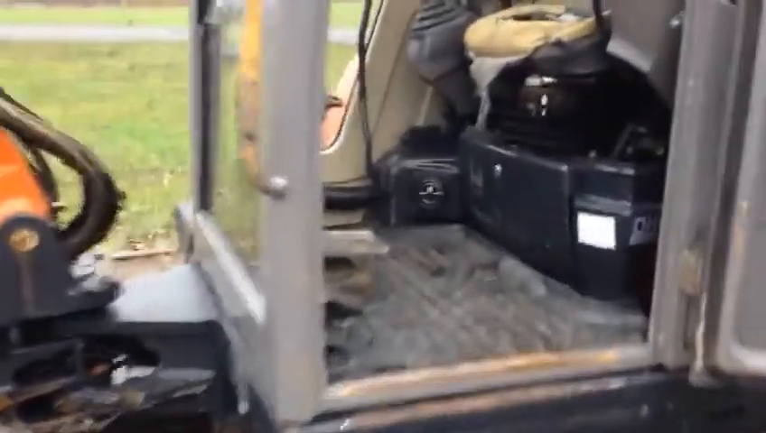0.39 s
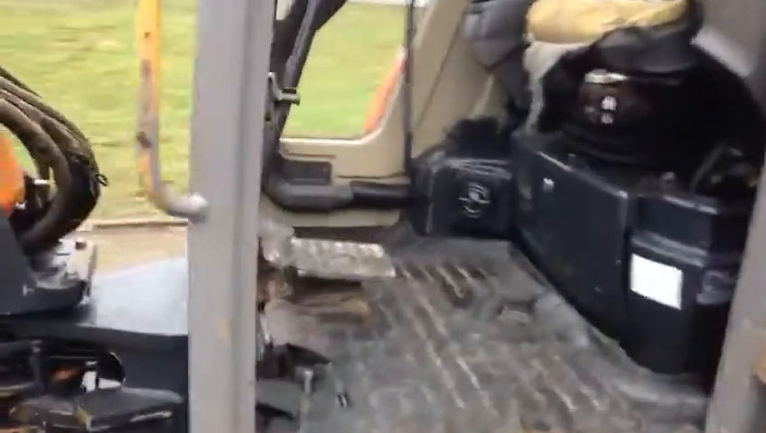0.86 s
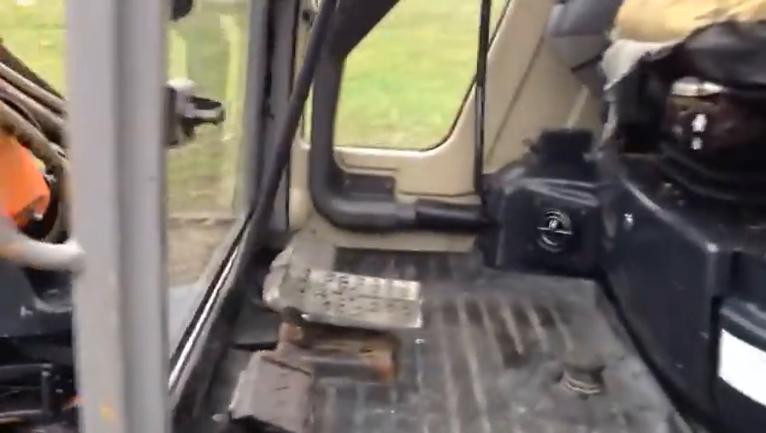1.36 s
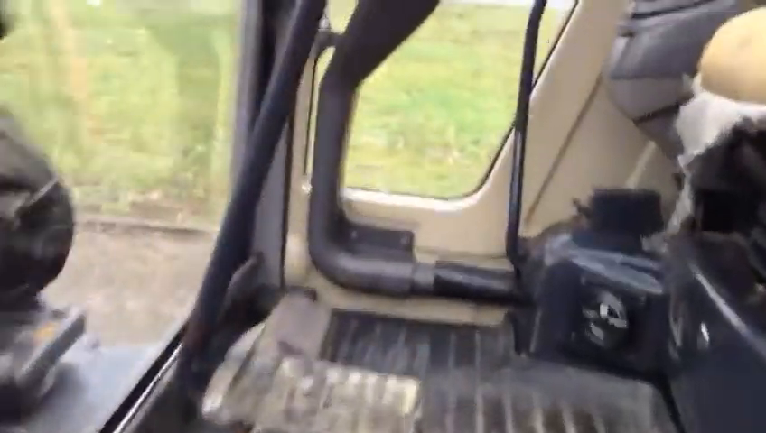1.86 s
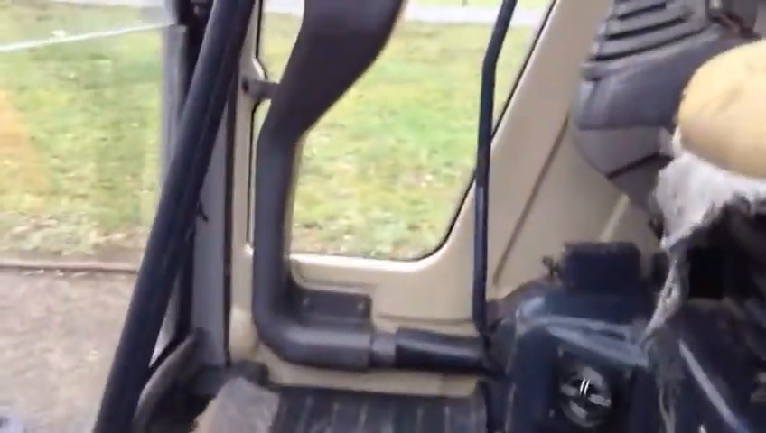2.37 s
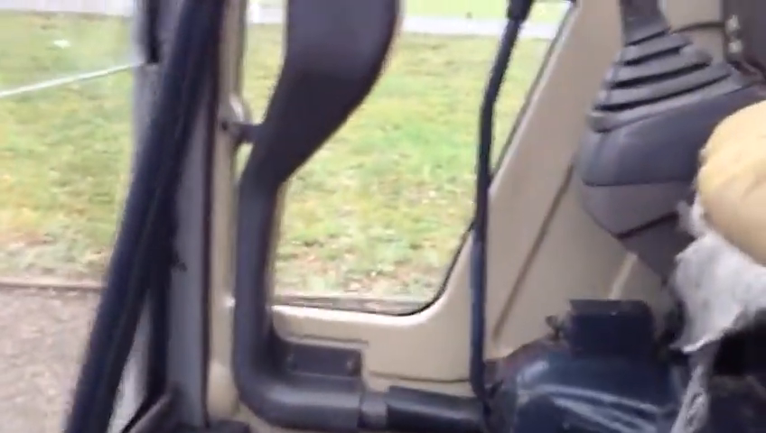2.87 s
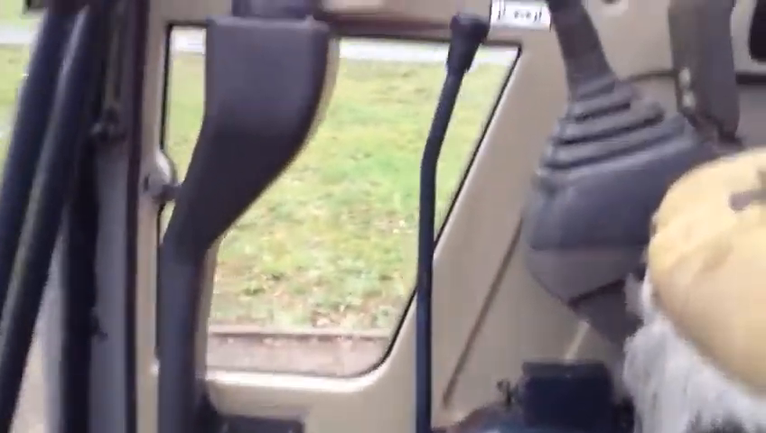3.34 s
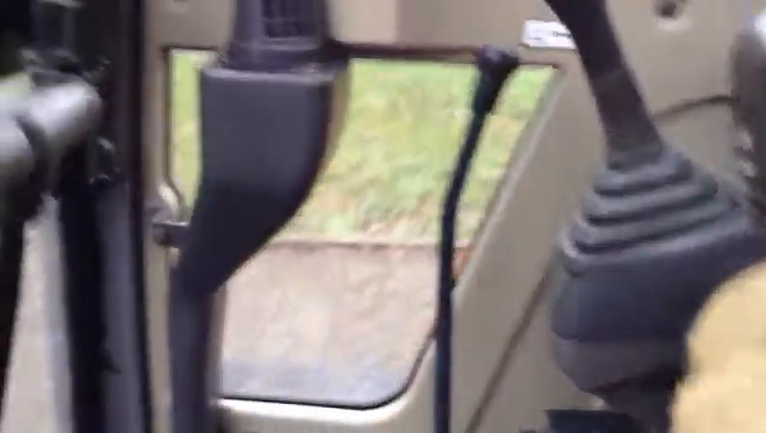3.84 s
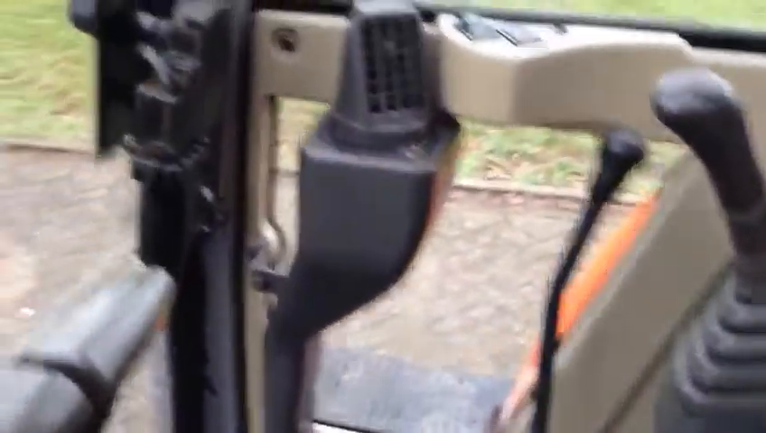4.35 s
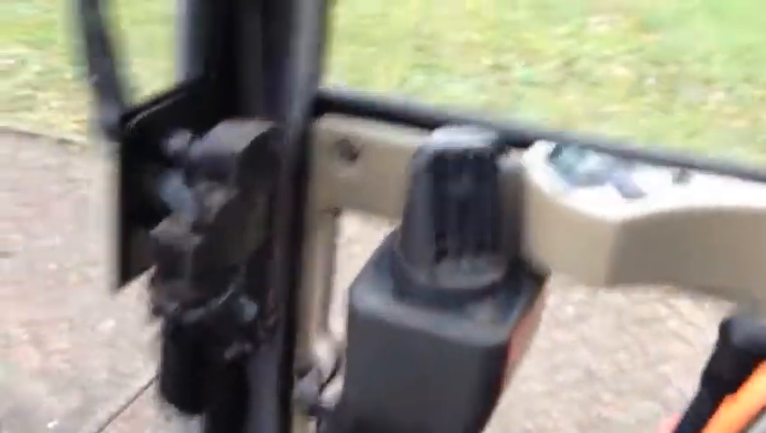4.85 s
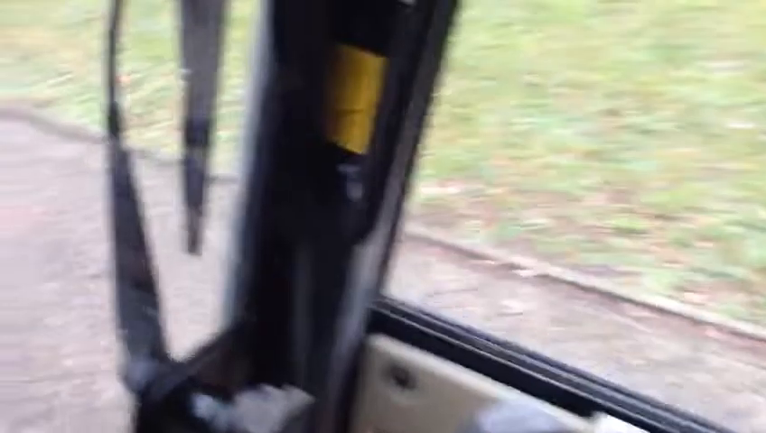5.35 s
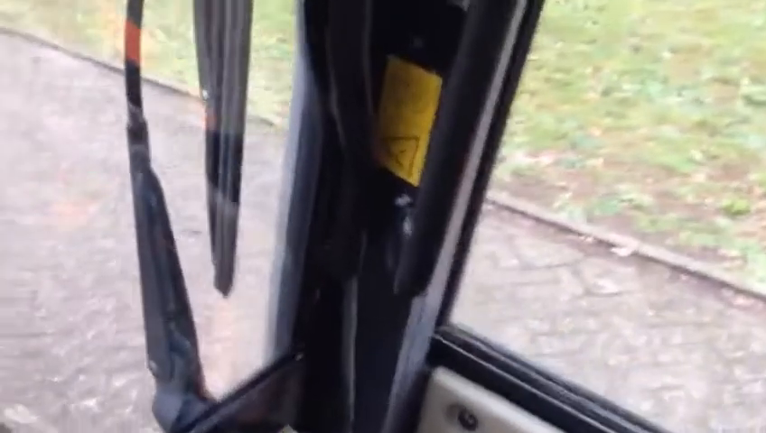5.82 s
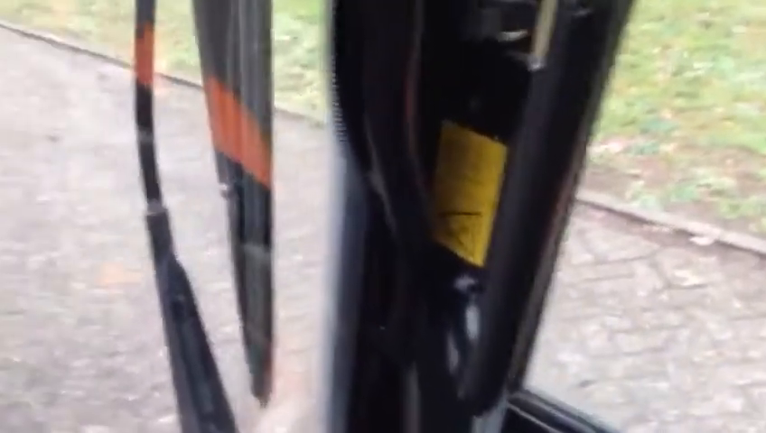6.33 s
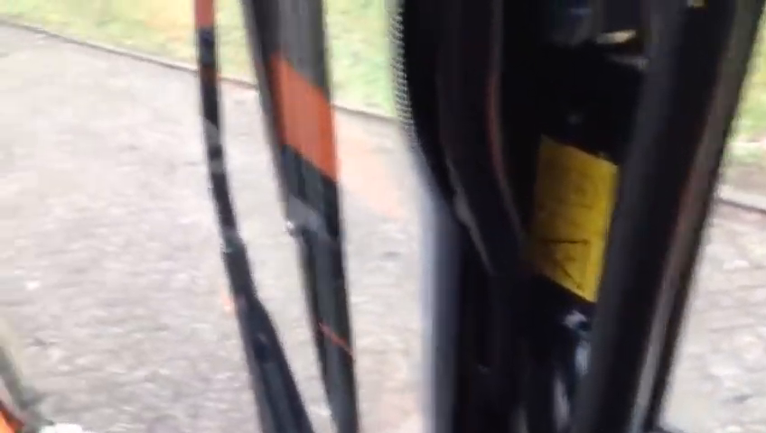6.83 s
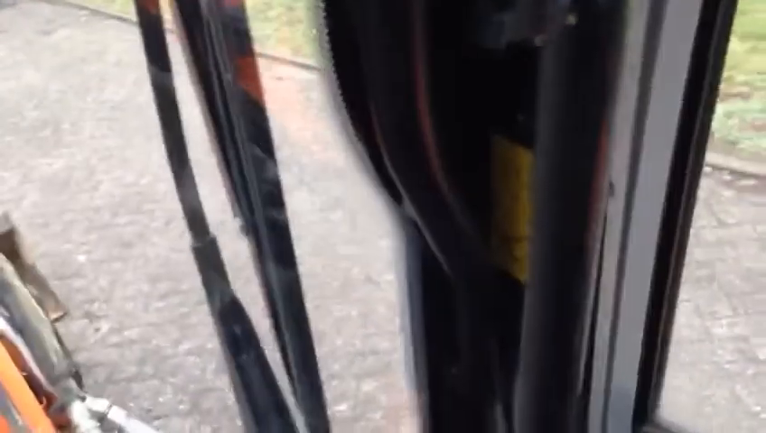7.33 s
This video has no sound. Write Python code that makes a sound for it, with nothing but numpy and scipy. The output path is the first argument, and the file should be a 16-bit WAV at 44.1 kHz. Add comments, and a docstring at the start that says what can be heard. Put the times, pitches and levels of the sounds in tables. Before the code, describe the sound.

A person gets into a small steel and glass digger cab. Wind bumps the close microphone over a faint outdoor hush, levers knock, and a heavy clattering bang leaves a short boxy echo and deep shudder. After a calmer stretch with a tick or two, fabric swishes and creaks, dull thuds and clacks come again, more cloth brushes, and something rattles briefly at the end.

```python
"""A person climbs into the steel and glass cab of a small digger, outdoors, holding a phone.
Over a far rumble and hush, puffs of wind pop first, as single cycles of pressure, amid brushes of filtered noise.
A latch and levers then clack, and a heavy clatter near 2 s leaves low booms, thin pings and a shuddering cab:
wandering modes, decaying sines, noise grains and a noise-tail reverberation. Light ticks follow; cloth rubs and
squeaks, as bands of noise, swell before a second set of knocks near 5.8 s and a last small rattle near 7.6 s."""
import sys
import numpy as np
from scipy import signal
from scipy.fft import rfft, irfft
from scipy.io import wavfile
from scipy.ndimage import uniform_filter1d

SR = 44100
rng = np.random.default_rng(int(sys.argv[2]) if len(sys.argv) > 2 else 0)


def to_wav(sig):
    """Store sig (one row per channel, or 1-D mono) as 16-bit WAV at the path in sys.argv[1].

    Samples outside -1..1 are clipped; the rate is SR.
    """
    pcm = np.clip(np.atleast_2d(sig), -1, 1) * 32767
    pcm = np.round(pcm).astype(np.int16)
    wavfile.write(sys.argv[1], SR, pcm.T)  # frames by channels


def volts(x):
    """Linear amplitude factor 10**(x/20) for a level x in dB, scalar or array-like."""
    e = np.asarray(x, float) / 20
    return 10 ** e


N = 339746  # length in samples

# Spectra of the noise layers, relative: freq_hz, density_db (per Hz)
# distant outdoor hush: freq_hz, density_db
FAR_SPECTRUM = [(120, -33.5), (200, -3), (309, -4), (404, -9.5), (585, -11), (658, -9.5), (1290, -17),
                (1890, -31), (2970, -30.5), (11000, -20), (14300, -56), (22000, -120)]
# lowest air movement: freq_hz, density_db
RUMBLE_SPECTRUM = [(12, -62.5), (20, -26), (24, -14), (30, -11), (42, -6.5), (54, 4.5), (74, 5), (91, -19),
                   (110, -17.5), (140, -46), (240, -120)]
# air movement above the rumble: freq_hz, density_db
FLUTTER_SPECTRUM = [(53, -42.5), (90, -13), (113, -12.5), (156, 4.5), (268, -10.5), (307, -14.5),
                    (450, -14), (580, -38), (990, -120)]
# dull body of the cloth: freq_hz, density_db
BODY_SPECTRUM = [(210, -40), (350, -7.5), (404, -6), (481, -9.5), (590, -3.5), (695, -8.5), (824, -10),
                 (895, -12), (1300, -13), (1690, -45), (2860, -120)]
# rasp of the cloth: freq_hz, density_db
RASP_SPECTRUM = [(650, -33), (1100, -4.5), (1270, -12.5), (1380, 0), (1550, 1.5), (2090, 1), (2440, -2.5),
                 (2800, -15.5), (3640, -42), (6160, -120)]
# hiss of the cloth: freq_hz, density_db
HISS_SPECTRUM = [(1410, -26), (2400, 0), (2960, -1), (3180, 1), (4600, -1), (9200, -8), (10500, -10),
                 (11000, -20.5), (14300, -62), (22000, -120)]

# moving air: time_s, rumble_db, flutter_over_rumble_db
AIR_LEVELS = [(0, -55, -2), (.5, -52, -11), (1.1, -50, -10), (1.6, -49, -5), (2.4, -54.5, -7.5),
              (3.0, -55, -11), (3.4, -57.5, -9.5), (3.65, -54, -5), (4.0, -55.5, -3.5), (4.2, -58, -2),
              (4.33, -43.5, -6.5), (4.68, -56.5, -2.5), (5.1, -47.5, -12), (5.28, -53.5, -5),
              (5.55, -48.5, -5.5), (5.73, -54.5, -4), (6.15, -47, -4), (6.5, -53, -6.5),
              (6.8, -49.5, -11.5), (7.1, -55.5, 0), (7.7, -54, -1.5)]
# the whole cab shudders after the heaviest blows: start_s, rumble_db, flutter_db, body_db (before rise and fall)
SHUDDERS = [(1.33, -57, -47, -58), (1.939, -36, -27, -34), (2.071, -25, -36, -65), (2.2, -37, -46.5, -77.5),
            (5.92, -28, -34.5, -64)]
# wind pops: time_s (3.5 ms ahead of mid-cycle), peak_db, cycle_s
WIND_POPS = [(0.284, -35.5, 0.016), (.395, -37.5, 0.0059), (.453, -38.5, 0.0063), (0.467, -40.5, 0.0071),
             (.486, -38, 0.016), (.678, -38.5, 0.0049), (.689, -40, 0.0092), (0.791, -36.5, 0.0096),
             (.968, -38, 0.0073), (1.001, -28, .0063), (1.032, -24.5, .005), (1.103, -34.5, .01),
             (1.167, -41, 0.012), (1.199, -39.5, 0.017), (1.514, -35, 0.0076), (2.37, -40, .01)]
# cloth on the seat: time_s, hiss_db, body_over_hiss_db, rasp_over_hiss_db
RUB_LEVELS = [(0, -66, 0, 0), (.4, -70, 6, -0.5), (1.0, -68, 1, -4), (1.8, -67.5, 1.5, 1),
              (2.2, -70, -3.5, -1), (2.72, -75.5, 2, -2.5), (3.5, -71.5, 2, -2), (4.05, -65, 3.5, 2.5),
              (4.35, -62.5, 3.5, 2.5), (4.85, -65.5, 3, 3), (5.1, -53.5, -0.5, -0.5), (5.3, -62, 4, -2),
              (5.57, -53.5, -2, -6.5), (5.75, -63.5, 3, -0.5), (6.0, -55, -1.5, -0.5), (6.3, -59, 2.5, -4),
              (6.5, -59.5, -3, -2.5), (6.8, -64.5, -4, -5), (7.3, -68, -5.5, -5.5), (7.6, -67, 3, -6),
              (7.7, -58.5, 1.5, -11.5)]
# short brushes of cloth, and narrow-band squeaks or creaks:
# start_s, length_s, top_db, centre_hz, treble_fall_db (per octave)
STROKES = [(0.299, 0.089, -55, 3530, 5.5), (0.388, 0.026, -61, 2000, 7), (0.627, 0.15, -59, 1750, 8.5),
           (1.105, 0.071, -59.5, 1770, 8), (1.235, 0.011, -57.5, 3000, 4), (4.946, 0.21, -52, 594, 85),
           (4.958, 0.14, -48.5, 820, 35), (5.04, 0.28, -55.5, 840, 65), (5.141, 0.083, -50.5, 1670, 47),
           (5.218, 0.013, -52, 360, 24), (5.461, 0.074, -47.5, 2020, 9), (5.505, 0.098, -42.5, 2200, 12.5),
           (5.506, 0.033, -50, 496, 21), (6.177, 0.11, -51, 417, 35), (7.399, .15, -63.5, 420, 15.5),
           (7.623, 0.036, -60, 1600, 15.5)]
# reverberation of the cab: freq_hz, t60_s
CAB_DECAY = [(200, 0.35), (1000, 0.19), (4000, 0.11), (10000, 0.093)]
# thin high rings after the clatter, one alone, then a close pair that beats: start_s, level_db, pitch_hz, t60_s
PINGS = [(1.98, -52, 8300, 0.26), (2.104, -66, 8180, 0.58), (2.105, -65, 8140, 0.7)]
# low booms of the cab near 60 Hz, and one short low push of a blow at 98 Hz:
# start_s, peak_db, pitch_hz, rise_s, t60_s
BOOMS = [(1.316, -18.5, 98, 0.0046, 0.026), (1.31, -35, 60.5, 0.011, 0.33), (1.94, -19, 62.16, 0.044, 0.39),
         (2.073, -25.5, 60.2, 0.029, 0.36), (4.765, -37, 64.2, 0.0052, 0.71),
         (5.772, -26.5, 58.6, 0.028, 0.47), (5.919, -33, 62, 0.024, 0.32)]
# dull blows on the panels: start_s, peak_db, strongest_hz
THUDS = [(1.281, -25.5, 350), (1.3, -18, 335), (1.319, -34, 121), (1.34, -29, 386), (1.361, -33, 239),
         (1.591, -36, 410), (1.602, -34, 383), (1.634, -43, 412), (1.838, -37.5, 358), (1.908, -18, 322),
         (1.923, -9.5, 302), (1.946, -14.5, 170), (1.964, -15, 174), (1.993, -16, 162), (2.014, -19.5, 170),
         (2.103, -21.5, 185), (3.585, -38, 244), (3.603, -42.5, 169.3), (4.749, -33.5, 314),
         (4.771, -32, 169), (5.597, -39.5, 201), (5.622, -49, 155), (5.764, -18.5, 152), (5.78, -14, 173),
         (5.796, -17, 152), (5.833, -21.5, 192), (5.912, -22, 455), (5.934, -24, 164)]
# metal contacts: start_s, level_db, frame_over_blow_db, brightest_hz, t60_s (raised to 0.01 s at least)
BLOWS = [(1.278, -31.5, 0.5, 3340, .13), (1.284, -33, -20, 1310, 0.068), (1.301, -20.5, -3, 2320, 0.053),
         (1.321, -40, 14, 2300, 0.032), (1.590, -39, 1, 3520, 0.065), (1.607, -46.5, 14.5, 3500, 0.082),
         (1.834, -30.5, -7, 2600, 0.038), (1.905, -16, -12.5, 3400, 0.32), (1.913, -8, -4, 8600, 0.038),
         (1.923, -5, -14, 3870, 0.13), (1.938, -1.5, -15, 3800, 0.038), (1.947, 3, -14.5, 7540, 0.029),
         (1.953, -8.5, -20, 3896, 0.076), (1.965, -11.5, -5.5, 2445, .1), (1.983, -19, -12.5, 5500, .05),
         (2.017, -22.5, -9, 3980, 0.045), (2.030, -32.5, 1, 3700, 0.089), (2.068, -41.5, 4, 4730, 0.042),
         (2.104, -15, -22, 6000, 0.027), (2.107, -17, -16, 2230, 0.059), (2.159, -39, -17, 3900, 0.025),
         (3.197, -51.5, -20, 2300, 0.037), (3.588, -56, -16.5, 1620, .074), (4.76, -62.5, 13.5, 1130, .041),
         (5.598, -46, -2, 1640, .083), (5.623, -45, 8, 1460, 0.055), (5.762, -26, 2.5, 6030, 0.077),
         (5.769, -32.5, 3, 1120, 0.061), (5.778, -20.5, -21, 1210, 0.044), (5.822, -34.5, 1, 6000, 0.053),
         (5.828, -20.5, -13, 1240, 0.063), (5.838, -32.5, -20, 2940, .05), (5.912, -34.5, 7.5, 2900, 0.014),
         (5.920, -29.5, 4, 1787, 0.064), (7.641, -39.5, -13.5, 7200, 0.11),
         (7.645, -32.5, -15, 2200, 0.056), (7.652, -32, -20.5, 1680, .07), (7.672, -37.5, -13, 1180, 0.059),
         (7.674, -37, -17, 4900, 0.035)]

# Modes of the metal, relative levels, t60 before each sound's damping
# big cab panels: pitch_hz, level_db, t60_s
PANEL_MODES = [(121, -3, 0.2), (165.5, -3, 0.23), (189, -1, 0.15), (225.4, 0, 0.18), (259.6, -3, 0.096),
               (325, 1, 0.11), (348.7, -2, .15), (395, -4.5, 0.17)]
# cab frame: pitch_hz, level_db, t60_s
FRAME_MODES = [(463.7, 5, 0.091), (552, 3, 0.16), (610.8, -6, .2), (718, -0.5, 0.16), (842, 0.5, 0.041),
               (940, -10.5, 0.27), (1016, -12.5, 0.18), (1425, -3.5, 0.16)]
# latch and levers: pitch_hz, level_db, t60_s
LATCH_MODES = [(1120, -3, .1), (1220, 0, .15), (1310, -5, .07), (1631, -3, .1), (1790, -4, .1),
               (2160, -7, .07), (2300, -3, .12), (2480, 0, .12), (2900, -4, .09), (3420, -3, .1),
               (3916, -2, .11), (4470, -5, .09), (4850, -8, .07), (5580, -2, .08), (6030, -4, .09),
               (6600, -6, .08), (7342, -3, .1), (7820, -5, .08), (8800, -8, .08), (10200, -6, .08)]


def unit(x):
    """Scaled to rms 1."""
    return x / np.sqrt(np.mean(x ** 2) + 1e-20)


def along(points, hz):
    """Reads (freq_hz, value) points on a log frequency axis."""
    f, v = np.transpose(points)
    return np.interp(np.log(hz + 1), np.log(f + 1), v)


def curves(rows):
    """One value per sample for each column after the time."""
    s, *cols = np.transpose(rows)
    return [np.interp(np.arange(N) / SR, s, c) for c in cols]


def add(track, s, sound):
    """Mixes a sound in at time s."""
    part = track[round(s * SR):][:len(sound)]
    part += sound[:len(part)]


def hump(hz, centre_hz, below_db, above_db):
    """Gain in dB, falling by so much per octave on either side of a centre."""
    octaves = np.log2((hz + 1) / centre_hz)
    return np.where(octaves < 0, below_db * octaves, -above_db * octaves)


def rush(spectrum, patchy_db, grainy_db):
    """Coloured noise of rms 1 with patches of random gain and a fast flicker."""
    flicker = unit(uniform_filter1d(rng.standard_normal(N), size=130))
    grains = rng.standard_normal(N) * volts(grainy_db * flicker)
    hz, _, z = signal.stft(grains, SR, nperseg=2048)
    field = uniform_filter1d(rng.standard_normal(z.shape), size=12, axis=0)
    field = uniform_filter1d(field, size=2, axis=1)
    z = z * volts(along(spectrum, hz)[:, None] + patchy_db * unit(field))
    return unit(signal.istft(z, SR, nperseg=2048)[1][:N])


def tinted(count, centre_hz, below_db, above_db, grainy_db):
    """Noise of rms 1 gathered round a centre, arriving in uneven millisecond grains."""
    gain = volts(hump(np.fft.rfftfreq(count, 1 / SR), centre_hz, below_db, above_db))
    white, flicker = rng.standard_normal((2, count))
    grains = volts(grainy_db * unit(uniform_filter1d(flicker, size=70)))
    return unit(irfft(rfft(white * grains) * gain, count))


def ring(modes, t, attack, damping, weight, wander):
    """Modes at new strengths each blow, their phases wandering as loose parts touch; peak 1."""
    hz, db, t60 = np.transpose(modes)[:, :, None]
    chance = rng.standard_normal((len(modes), len(t) + 1))
    level = volts(db + weight(hz) + 2.4 * chance[:, :1] - 60 * t / (t60 * damping))
    # the modes that die fastest wander most
    drift = np.cumsum(chance[:, 1:], axis=1) * wander / np.sqrt(t60 * SR)
    x = np.sum(level * np.sin(2 * np.pi * hz * t + drift), axis=0)
    x = x * (1 - np.exp(-t / attack))
    return x / np.max(np.abs(x))


def shudder():
    """Gains that the shaking cab adds to rumble, flutter and body noise: a quick rise, then a steady fall."""
    rise_s, t60_s = 0.01, 0.3
    s, *dbs = np.transpose(SHUDDERS)[:, :, None]
    t = np.maximum(np.arange(N) / SR - s, 0)
    shape = (1 - np.exp(-t / rise_s)) * volts(-60 * t / t60_s)
    return [np.sum(volts(db) * shape, axis=0) for db in dbs]


def outdoors():
    """Lumpy low air movement, noise in two low bands, over an even far hush."""
    rumble_db, flutter_db = curves(AIR_LEVELS)
    rumble_shake, flutter_shake, _ = shudder()
    rumble_gain = volts(rumble_db) + rumble_shake
    rumble = rumble_gain * rush(RUMBLE_SPECTRUM, patchy_db=2.0, grainy_db=-2.0)
    flutter_gain = volts(rumble_db + flutter_db) + flutter_shake
    flutter = flutter_gain * rush(FLUTTER_SPECTRUM, patchy_db=3.5, grainy_db=0.5)
    far = volts(-69) * rush(FAR_SPECTRUM, patchy_db=1, grainy_db=.3)
    return rumble + flutter + far


def pops():
    """A puff of wind on the microphone port is one suck and push of pressure."""
    out = np.zeros(N)
    # small pops at random before the cab shelters the microphone
    faint_count, faint_until_s = 9, 2.5
    middle_db, spread_db, mean_cycle_s = -47, 2.5, 0.0072
    faint = [(faint_until_s * when, middle_db + spread_db * (2 * size - 1), mean_cycle_s * (.5 + long))
             for when, size, long in rng.random((faint_count, 3))]
    for s, db, cycle_s in WIND_POPS + faint:
        u = (np.arange(SR // 20) / SR - .0285) / max(cycle_s / 4, .0005)
        puff = 2.3 * u * np.exp(-u * u)  # 2.3 brings the peak close to 1
        add(out, max(s - .025, 0), volts(db) * puff)
    return out


def strokes():
    """Brushes of cloth and narrow-band squeaks or creaks: filtered noise that swells and fades once."""
    out = np.zeros(N)
    for s, length_s, db, hz, fall_db in STROKES:
        stroke = np.clip(np.arange(SR // 4) / SR / length_s, 0, 1)
        swell = np.sin(np.pi * stroke ** 0.59) ** 1.36 * (stroke < 1)
        noise = tinted(len(stroke), hz, 1.23 * fall_db, fall_db, grainy_db=0.5)
        add(out, s, volts(db) * swell * noise)
    return out


def cloth():
    """Rubbing fabric: a dull body that the shudders lift, a rasp and a hiss."""
    hiss_db, body_db, rasp_db = curves(RUB_LEVELS)
    body_gain = volts(hiss_db + body_db) + shudder()[2]
    body = body_gain * rush(BODY_SPECTRUM, patchy_db=2.5, grainy_db=-0.5)
    rasp = volts(hiss_db + rasp_db) * rush(RASP_SPECTRUM, patchy_db=2.3, grainy_db=1.13)
    hiss = volts(hiss_db) * rush(HISS_SPECTRUM, patchy_db=1.96, grainy_db=-0.75)
    return body + rasp + hiss


def cab(x):
    """The air of the cab answers with a noise tail in which each frequency dies at its own speed."""
    hz, t, z = signal.stft(rng.standard_normal(SR // 2), SR, nperseg=256)
    fade = volts(-60 * t / along(CAB_DECAY, hz)[:, None])
    tail = signal.istft(z * fade, SR, nperseg=256)[1]
    return signal.fftconvolve(x, tail / np.linalg.norm(tail))[:N]


def pings():
    """Thin, pure, long high rings: decaying sines, the close pair beating."""
    out, t = np.zeros(N), np.arange(SR) / SR
    for s, db, hz, t60 in PINGS:
        add(out, s, volts(db - 60 * t / t60) * np.sin(2 * np.pi * hz * t))
    return out


def booms():
    """Low booms of the cab and one short push of a blow: sines that swell and die away."""
    out, t = np.zeros(N), np.arange(SR) / SR
    for s, db, hz, rise_s, t60 in BOOMS:
        shape = (1 - np.exp(-t / rise_s)) ** 2 * volts(-60 * t / t60)
        add(out, s, volts(db) * shape / shape.max() * np.sin(2 * np.pi * hz * t))
    return out


def thuds():
    """The big panels, and the lowest mode of the frame, ring strongest near each blow's own pitch."""
    out, t = np.zeros(N), np.arange(SR // 2) / SR
    modes = PANEL_MODES + FRAME_MODES[:1]
    for s, db, strong_hz in THUDS:
        # seals and hands shorten the panels' own t60 to a share of 0.86
        panel = ring(modes, t, 0.0018, 0.86, lambda hz: hump(hz, strong_hz, 21, 22), wander=3.7)
        add(out, s, volts(db) * panel)
    return out


def blows():
    """Each contact chatters as a noisy clack and rings the frame and the latch modes near its own pitch."""
    out, t = np.zeros(N), np.arange(SR // 3) / SR
    for s, db, frame_db, bright_hz, t60 in BLOWS:
        t60 = max(t60, .01)
        # harder is brighter: treble falls 5 dB per octave at 0 dB and above, 12.5 at -26 dB and below
        fall_db = 5 + 7.5 * np.clip(-db / 26, 0, 1)
        fade = volts(-60 * t / t60) * (1 - np.exp(-t / .0016))
        clack = volts(-7) * fade * tinted(len(t), bright_hz, 0.31 * fall_db, fall_db, grainy_db=3.5)
        # hard blows shake loose parts: less clear ring, more clatter
        force = np.clip(1 + db / 25, 0, 1)
        latch = ring(LATCH_MODES, t, .0012, t60 / .11,
                     lambda hz: hump(hz, bright_hz, 22, fall_db + 14), wander=1.8 + 6 * force)
        steel = volts(-2 - 9 * force) * latch
        frame = ring(FRAME_MODES, t, 0.00087, np.sqrt(t60 / 0.32), lambda hz: 0, wander=3.2)
        rattle = volts(-10) * np.sqrt(fade) * tinted(len(t), 710, 15, 11, grainy_db=2.0)
        add(out, s, volts(db) * (clack + steel + volts(frame_db) * (frame + rattle)))
    return out


def scene():
    """Everything at one microphone; only blows and thuds excite the cab's reverberation."""
    background = outdoors() + pops() + cloth() + strokes()
    metal = blows() + thuds()
    after = volts(-13.5) * cab(metal) + pings() + booms()
    return (background + metal + after)[None]


def band_limit(x):
    """A steep low-pass at the top of the band."""
    return signal.sosfilt(signal.butter(12, 11670, fs=SR, output="sos"), x)


def record(dry):
    """The phone cuts deep bass, rounds off the highest peaks and cuts the treble."""
    thin = signal.sosfilt(signal.butter(2, 32, "high", fs=SR, output="sos"), dry)
    rounded = thin / (1 + np.abs(thin / .8) ** 8) ** (1 / 8)  # levels off towards 0.8
    low_pass = signal.cheby2(14, 70, 11694, fs=SR, output="sos")  # 70 dB down from 11694 Hz up
    finished = signal.sosfilt(low_pass, rounded)
    return band_limit(finished)


dry = scene()
out = record(dry)
to_wav(out)
```